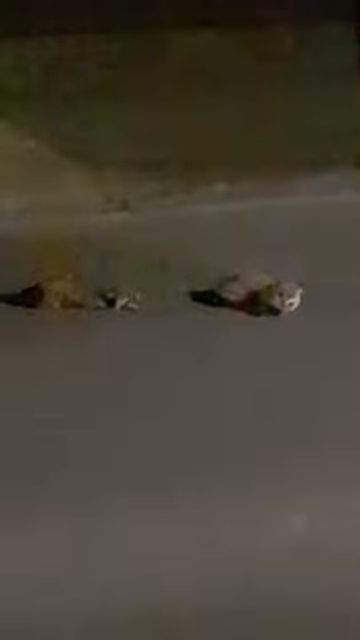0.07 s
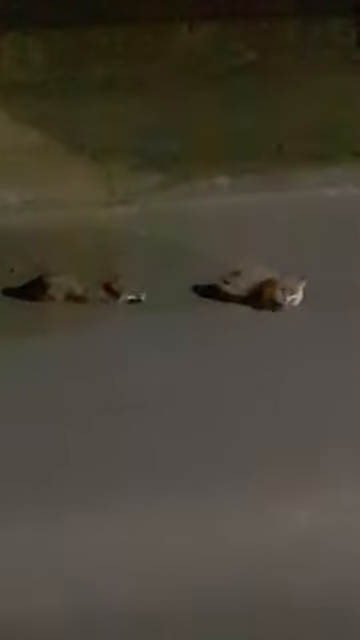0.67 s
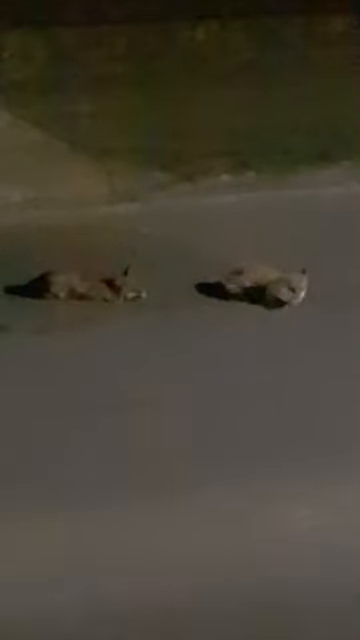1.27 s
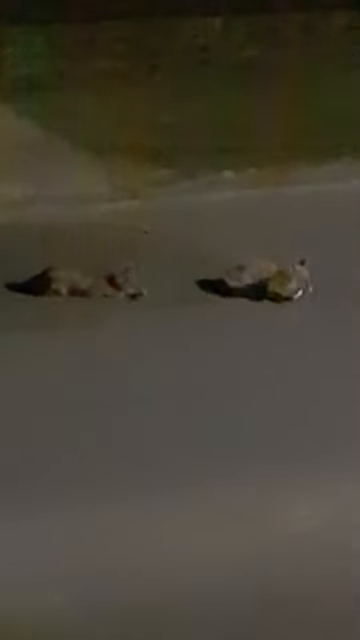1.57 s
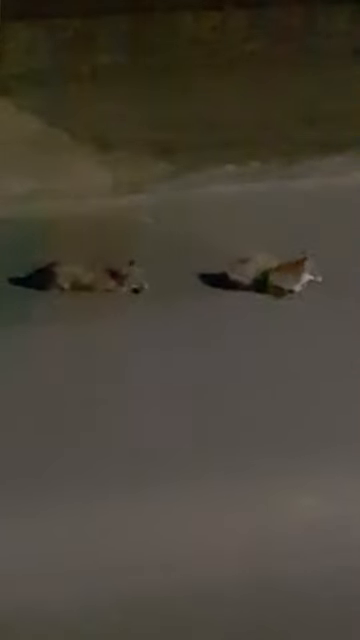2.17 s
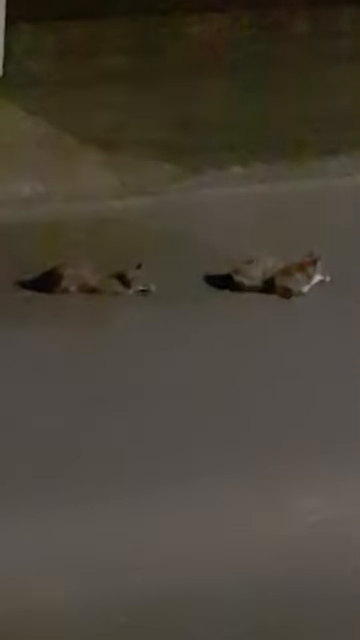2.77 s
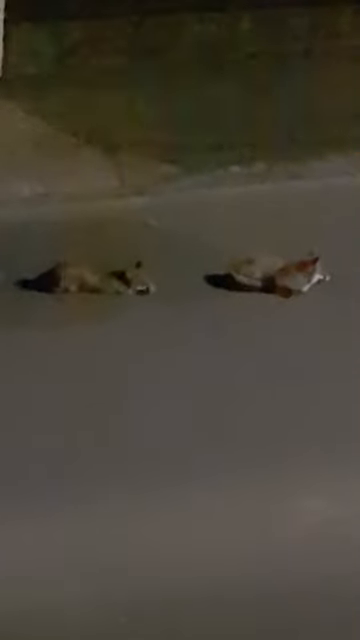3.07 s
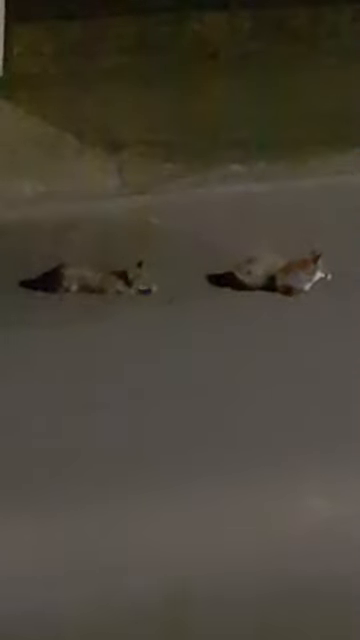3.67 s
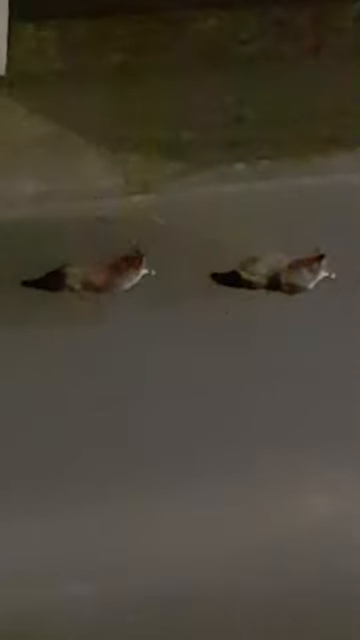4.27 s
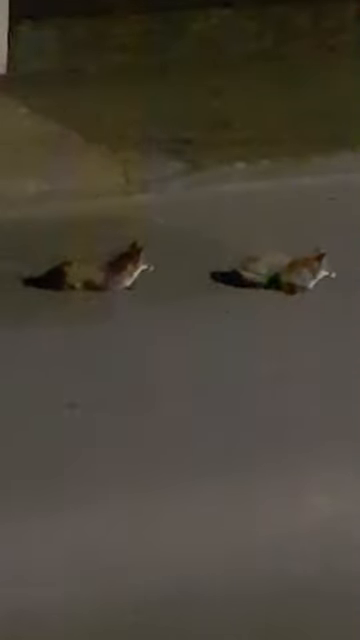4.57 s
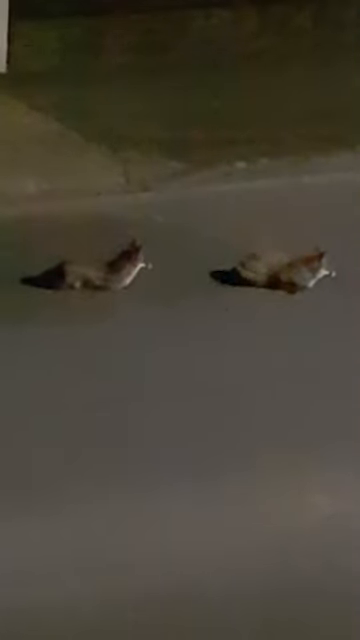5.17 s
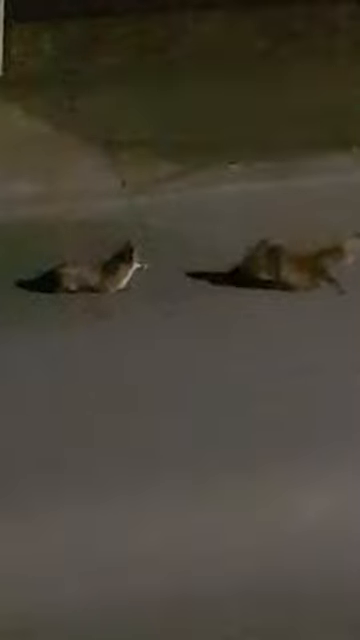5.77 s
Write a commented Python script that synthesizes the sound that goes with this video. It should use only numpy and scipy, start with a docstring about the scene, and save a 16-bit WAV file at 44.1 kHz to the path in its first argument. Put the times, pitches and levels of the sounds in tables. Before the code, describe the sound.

Two foxes cry out together at the start, one with a rasping, piercing scream that sags in pitch, the other with three short wails. After a brief gap come a quick yelp and a thin, falling whine, each with a short outdoor echo. The night street then stays quiet, with far traffic rumbling under light microphone hiss and a couple of very faint rustles.

```python
"""Two foxes face off on a quiet street at night. One opens with a high, harsh scream from overdriven
vocal folds; the other wails across it three times. A short yelp follows at 0.9 s, a long falling whine
at 1.5 s, then two faint rustles. House fronts throw the calls back. Throughout, far traffic rumbles
under the faint hiss of the microphone."""
import sys
import numpy as np
from scipy import signal
from scipy.fft import rfft, irfft
from scipy.io import wavfile
from scipy.ndimage import uniform_filter1d

SR = 44100
rng = np.random.default_rng(int(sys.argv[2]) if len(sys.argv) > 2 else 0)


def wav_out(sig):
    """Save sig, one row per channel (or a flat mono array), as 16-bit PCM at SR to the path in sys.argv[1]."""
    wavfile.write(sys.argv[1], SR, np.round(np.clip(np.atleast_2d(sig).T, -1, 1) * 32767).astype(np.int16))


N = 256662
T = np.arange(N) / SR
HZ = np.fft.rfftfreq(N, 1 / SR)

# Held scream. Each row: time in seconds, pitch in Hz.
SCREAM_PITCH = [(0, 1517), (0.029, 1559), (.16, 1548), (0.199, 1477), (0.227, 1556), (0.251, 1560),
                (.28, 1507), (0.321, 1464), (.43, 1433), (.475, 1349), (.57, 1203)]
# Other calls. Each row: time in seconds, pitch in Hz, level in dB, jaw opening from 0 to 1.
WAIL_CURVES = [
    [(.115, 1465, -34.5, 0.3), (.145, 1312, -39.5, 0.47), (.175, 1240, -37, 0.79), (.215, 1328, -45, .4)],
    [(.25, 1352, -38.5, 0.1), (.28, 1320, -36, .66), (.31, 1212, -32, .66), (.333, 1099, -28, .8),
     (.347, 1043, -35, .8)],
    [(.39, 1091, -32.5, 0.72), (.405, 1107, -27, 0.68), (.44, 1161, -30.5, 0.88), (.5, 1083, -30.5, 0.7),
     (.53, 1077, -40, .62), (.555, 1045, -44, .15), (.59, 957, -46.5, 0.33), (.635, 897.5, -39, .1),
     (.68, 712, -52, 0.38)],
]   # one list per wail
YELP_CURVE = [(.904, 1341, -37, 0), (.938, 1437, -33.5, .24), (.955, 1386, -37.5, 0.21),
              (.97, 1292, -28.5, .43), (.988, 1180, -38.5, 0.46), (1.005, 940, -47, 0.2),
              (1.028, 815, -41.5, 0.1), (1.035, 523, -65, .05), (1.052, 380, -59, .05)]
WHINE_CURVE = [(1.472, 1176, -58, 0.33), (1.528, 1260, -37.5, 0.71), (1.548, 1188, -32, 0.49),
               (1.575, 1049, -43, 0.21), (1.685, 1046, -42.5, 0.13), (1.72, 1034, -56.5, 0.4),
               (1.74, 1054, -41.5, .02), (1.82, 1030, -46, .17), (1.86, 920, -49, 0.31),
               (1.9, 856, -46, 0.034), (1.99, 677.5, -60, .01)]
# Mouth filter of each call. Each row: frequency in Hz, gain in dB.
SCREAM_MOUTH = [(4000, -0.5), (4650, 3.5), (6100, -15), (7600, -1.5), (9000, -10.5), (10700, -1.5),
                (11300, -11.5), (11700, -29), (15000, -39)]
WAIL_MOUTH = [(2900, -4), (3450, 3.5), (3900, -6), (4600, 0), (5500, -8), (6700, -0.5), (7600, -9),
              (8500, 3.5), (9100, -7), (9700, -4.5), (11000, -19.5), (11700, -34), (14000, -41.5)]
YELP_MOUTH = [(2500, -2), (3900, 8.5), (5000, -9), (5800, 5), (7000, -8), (8500, -13), (11000, -30)]
WHINE_MOUTH = [(2600, -8), (3100, -5.5), (3550, 1.5), (3800, 4.5), (4200, -19), (4900, -26), (5300, -4),
               (6000, -7), (6500, -4), (7200, -22), (8200, -11), (9500, -26), (10800, -7), (13000, -32)]
# Spectra of the scream's rattle and of throat air. Each row: frequency in Hz, gain in dB.
RATTLE_SPECTRUM = [(300, -59), (620, -39), (780, -8), (865, -4.5), (935, -13.5), (1220, -14.5),
                   (1550, -6.5), (1800, 0.5), (1990, -8.5), (2170, 3.5), (2450, -9.5), (2800, -15.5),
                   (3600, -26), (4300, -31.5), (5200, -19), (6300, -34.5), (8500, -26), (9500, -31.5),
                   (11000, -30), (14000, -49.5)]
RASP_SPECTRUM = [(500, -20), (900, -0.5), (1400, 7.5), (2400, 8), (3600, 3), (16000, 1.5)]
# Throat catches as the wailing starts. Each row: start in seconds, level before filtering in dB.
THROAT_CATCHES = [(.102, -35.5), (.119, -35.5), (.134, -32.5)]
# House-front echoes. Each row: delay in seconds, gain in dB, left minus right in dB.
HOUSE_ECHOES = [(.061, -7, -1), (.134, -23, -1)]
# Street reverberation. Each row: band centre in Hz, 60 dB decay time in seconds, gain in dB.
REVERB_BANDS = [(700, 0.86, -11.5), (1420, 1, -12.5), (2505, 0.78, -18), (4425, 0.46, -4),
                (9120, 0.29, -16)]
# Tyre roar. Each row: time in seconds, level in dB.
TYRE_LEVELS = [(0, -65.5), (1.1, -72), (2.2, -69.5), (2.95, -72.5), (3.3, -69.5), (4.1, -73), (4.75, -69.5),
               (5.82, -71)]
# Far engine. Each row: peak time in seconds, pitch in Hz, peak level in dB.
ENGINE_SWELLS = [(.4, 122, -48), (2.35, 143, -63), (4.65, 143.7, -49), (5.8, 140, -55)]
# Rustles. Each row: peak time in seconds, length in seconds, level in dB.
RUSTLE_SWELLS = [(3.102, 0.32, -82), (4.498, .5, -83.5)]
# Background noise spectra. Each row: frequency in Hz, gain in dB.
RUMBLE_SPECTRUM = [(15, -46.5), (25, -16.5), (40, -15.5), (75, -4), (134, -0.5), (172, -7), (228, -6.5),
                   (280, -10.5), (450, -26), (574, -28.5), (640, -27.5), (830, -54), (1410, -120)]
RUMBLE_SIDE_BOOST = [(25, 7), (80, -0.5), (170, -0.5), (350, 7.5), (600, 8.5)]   # on the left-right difference only
TYRE_SPECTRUM = [(400, -9), (620, -13), (740, -2.5), (820, -2.5), (950, -10.5), (1300, -21), (1900, -28.5),
                 (2250, -16), (2600, -34), (4000, -39.5)]
RUSTLE_SPECTRUM = [(1500, -20), (3000, -2), (4000, 0), (5500, -8), (10000, -13)]
HISS_SPECTRUM = [(500, -6), (1500, 2), (3000, -1.5), (5000, -4), (8000, -6), (10000, -3.5), (12000, -1),
                 (15700, -1)]
# Right microphone port against the left. Each row: frequency in Hz, phase in radians.
PORT_PHASE = [(1000, -0.088), (1420, 0.68), (2000, -0.069), (2580, -.22), (3200, -0.047), (4500, 0)]


def scream(top_hz=1550, base_db=-25, push_db_per_s=9, sag_db_per_hz=.042, attack_s=.035, release_s=.1):
    """The fox pushes harder as it goes on, but the tone weakens as its pitch sags."""
    sag_hz = top_hz - in_time(SCREAM_PITCH)[0]
    start_s, end_s = SCREAM_PITCH[0][0], SCREAM_PITCH[-1][0]
    envelope_db = np.interp(T, [start_s, start_s + attack_s, end_s - release_s, end_s], [-3, 0, 0, -5])
    db = base_db + push_db_per_s * (T - start_s) - sag_db_per_hz * sag_hz + envelope_db
    tone, pitch_hz, phase = voice(SCREAM_PITCH, (db, db - 24, db - 37), SCREAM_MOUTH, jitter=.0025,
                                  wobble=.002, shimmer_db=.6, rasp_db=-1, flicker_db=3)
    # The rattle stays strong through the sag, then dies just before the tone ends.
    # It needs full effort, so the envelope counts twice.
    rattle_db = db + envelope_db - 19 + .038 * sag_hz
    return tone + rattle(pitch_hz, phase, rattle_db)


def rattle(pitch_hz, phase, level_db, waver_db=3, blur_rad=.2, fade_from_s=.515, fade_db_per_s=350.5):
    """Overdriven folds repeat only every fifth cycle, adding lines between the scream's harmonics."""
    gate, lines = call_gate(SCREAM_PITCH), np.zeros(N)
    on = gate > 0
    waver, slip_rad = drift(46), blur_rad * drift(120)
    for k in [n / 5 for n in range(2, 45) if n % 5]:
        line_db = at_hz(RATTLE_SPECTRUM, k * pitch_hz[on]) + waver_db * shifted(waver)[on]
        # Higher lines blur into hoarseness.
        offset_rad = rng.uniform(0, 2 * np.pi) + max(k - 1, 0) * shifted(slip_rad)[on]
        lines[on] += from_db(line_db) * np.sin(k * phase[on] + offset_rad)
    fade_db = fade_db_per_s * np.maximum(T - fade_from_s, 0)
    return gate * lines * from_db(level_db - fade_db)


def cry(curve, mouth, overtones_db, follow, medium_db=-40, slack_hz=940, bloom_s=.011, **texture):
    """Wail, yelp or whine. An opening jaw shifts energy to the octave and lifts the overtones."""
    pitch_hz, db, jaw = in_time(curve)
    opening = np.clip(jaw, 0, 1) - .5
    octave_lead_db = 59.5 * opening
    fundamental_db = db - 10 * np.log10(1 + from_db(octave_lead_db) ** 2)
    # Overtones bloom after the onset, fade as the folds go slack and follow part of the level swing.
    bloom_db = 13 * np.exp(-np.maximum(T - curve[0][0], 0) / bloom_s)
    slack_db = .24 * np.maximum(slack_hz - pitch_hz, 0)
    upper_db = overtones_db + follow * (db - medium_db) + 7.5 * opening - slack_db - bloom_db
    return voice(curve, (fundamental_db, fundamental_db + octave_lead_db, upper_db), mouth, **texture)[0]


def voice(curve, levels_db, mouth, jitter, wobble, shimmer_db, rasp_db, flicker_db):
    """Vocal folds on an unsteady pitch; air torn by each cycle adds rasp."""
    pitch_hz = in_time(curve)[0]
    fundamental_db, octave_db, upper_db = levels_db
    gate = call_gate(curve)
    on = gate > 0
    # Faster slides make the folds less regular.
    slide_per_s = uniform_filter1d(np.abs(np.gradient(np.log(pitch_hz))) * SR, size=700)
    roughness = 1 + np.minimum(slide_per_s / 4, 2)
    unsteady_hz = pitch_hz * (1 + wobble * drift(40) + jitter * roughness * drift(350))
    phase = 2 * np.pi * np.cumsum(unsteady_hz) / SR
    tone = from_db(fundamental_db) * np.sin(phase) + from_db(octave_db) * np.sin(2 * phase)
    wander_db = flicker_db * drift(32)
    for k in range(3, 13):
        harmonic_db = upper_db[on] + at_hz(mouth, k * pitch_hz[on]) + shifted(wander_db)[on]
        tone[on] += from_db(harmonic_db) * np.sin(k * phase[on])
    pulsed_air = noise(RASP_SPECTRUM, mouth) * (1 + .4 * np.cos(phase))
    rasp = from_db(upper_db + rasp_db) * roughness * pulsed_air
    return gate * (tone * from_db(shimmer_db * drift(180)) + rasp), pitch_hz, phase


def call_gate(curve, fade_s=.0055):
    """Opens just before a call, shuts just after it."""
    return np.clip(np.minimum(T - curve[0][0], curve[-1][0] - T) / fade_s + 1, 0, 1)


def throat_catches(decay_s=.002):
    """Tiny bright bursts of air."""
    bursts = sum(from_db(db) * (T >= s) * np.exp(-np.abs(T - s) / decay_s) for s, db in THROAT_CATCHES)
    return bandpass(bursts * rng.standard_normal(N), 6000, 7600)


def street(calls, build_up_s=.011):
    """Distinct echoes off house fronts, then a scattered tail whose treble dies first."""
    thin = bandpass(calls, 1050, 2200)
    echoes = sum(panned(from_db(db) * np.interp(T - delay_s, T, thin, left=0), pan_db)
                 for delay_s, db, pan_db in HOUSE_ECHOES)
    t, tail = T[:SR], 0
    white = rfft(rng.standard_normal((2, SR)))
    log_hz = np.log(np.arange(white.shape[1]) + 1)
    log_centres = np.log([row[0] for row in REVERB_BANDS])
    for share, (_, t60_s, db) in zip(np.eye(len(REVERB_BANDS)), REVERB_BANDS):
        band = irfft(white * np.interp(log_hz, log_centres, share), SR)
        decay = from_db(-60 * t / t60_s) * (1 - np.exp(-t / build_up_s))
        tail = tail + from_db(db) * band * decay / np.linalg.norm(decay)
    return echoes + signal.fftconvolve(wide(*tail, side_db=-5), calls[None], axes=1)[:, :N]


def traffic(rumble_db=-53, ease_db_per_s=.5346, swell_db_per_s=83.5):
    """Far off: a slowly easing rumble, tyre roar and swells of one engine's wavering drone."""
    rumble = wide(noise(RUMBLE_SPECTRUM), noise(RUMBLE_SPECTRUM, RUMBLE_SIDE_BOOST), side_db=-29.5)
    rumble *= from_db(rumble_db - ease_db_per_s * T)
    tyres = wide(noise(TYRE_SPECTRUM), noise(TYRE_SPECTRUM), side_db=-13.5)
    tyres *= from_db(in_time(TYRE_LEVELS)[0])
    engine_hz = in_time(ENGINE_SWELLS)[0] * (1 + .09 * drift(15))
    swells = sum(from_db(db - swell_db_per_s * np.abs(T - s)) for s, _, db in ENGINE_SWELLS)
    engine = swells * np.sin(2 * np.pi * np.cumsum(engine_hz) / SR)
    return rumble + tyres + engine


def rustles(patchy_db=3):
    """Soft, uneven brushing that swells and fades."""
    swells = sum(from_db(db) * np.exp(-(2 * (T - s) / length_s) ** 2) for s, length_s, db in RUSTLE_SWELLS)
    return swells * from_db(patchy_db * drift(20)) * noise(RUSTLE_SPECTRUM)


def microphone_hiss(level_db=-73):
    """Steady self-noise."""
    return from_db(level_db) * wide(noise(HISS_SPECTRUM), noise(HISS_SPECTRUM), side_db=-7.5)


def from_db(db):
    """Decibels to gain."""
    return 10 ** (np.asarray(db) / 20)


def unit_rms(x):
    """Scale to unit power."""
    return x / np.sqrt(np.mean(x ** 2) + 1e-20)


def in_time(rows):
    """Each column after time, at every sample."""
    times_s, *columns = np.transpose(rows)
    return [np.interp(T, times_s, column) for column in columns]


def at_hz(spectrum, hz):
    """Interpolate on a log-frequency axis."""
    points_hz, values = np.transpose(spectrum)
    return np.interp(np.log(hz + 1), np.log(points_hz), values)


def drift(rate_hz):
    """Unit-power wander, up to about rate_hz."""
    return unit_rms(irfft(rfft(rng.standard_normal(N)) / (1 + (HZ / rate_hz) ** 2), N))


def shifted(x):
    """Random circular shift, so each partial wanders by itself."""
    return np.roll(x, rng.integers(N))


def noise(*spectra):
    """Unit-power noise, shaped by all given spectra."""
    gain = from_db(sum(at_hz(spectrum, HZ) for spectrum in spectra))
    return unit_rms(irfft(rfft(rng.standard_normal(N)) * gain, N))


def bandpass(x, low_hz, high_hz):
    """Butterworth band-pass."""
    return signal.sosfilt(signal.butter(2, [low_hz, high_hz], "band", fs=SR, output="sos"), x + 1e-18)


def wide(mid, side, side_db):
    """Two close microphones hear nearly the same thing."""
    return mid + from_db(side_db) * side * np.array([[1], [-1]])


def panned(x, pan_db):
    """Place a source by left-minus-right level."""
    return x * from_db(np.array([[.5], [-.5]]) * pan_db)


def scene():
    """The foxes in the street, over traffic, rustles and hiss."""
    wails = sum(cry(curve, WAIL_MOUTH, overtones_db=-63.5, follow=.45, jitter=.002, wobble=.007,
                    shimmer_db=1, rasp_db=-9, flicker_db=4) for curve in WAIL_CURVES)
    yelp = cry(YELP_CURVE, YELP_MOUTH, overtones_db=-67.5, follow=.92, jitter=.006, wobble=.002,
               shimmer_db=.5, rasp_db=-6, flicker_db=3)
    whine = cry(WHINE_CURVE, WHINE_MOUTH, overtones_db=-69, follow=.85, jitter=.005, wobble=.005,
                shimmer_db=.6, rasp_db=-10, flicker_db=5.5)
    duet = panned(scream(), pan_db=-3.3) + panned(wails + throat_catches(), pan_db=-2)
    late_calls = panned(yelp + whine, pan_db=1.85)
    # The duet is aimed away from the house fronts, so less of it returns.
    to_walls = (from_db(-5) * duet + late_calls).mean(axis=0)
    hiss = microphone_hiss()
    return duet + late_calls + street(to_walls) + traffic() + rustles() + hiss


def record(dry, cutoff_hz=15750):
    """The two ports differ slightly in phase; the top is cut steeply."""
    phase_rad = at_hz(PORT_PHASE, np.fft.rfftfreq(2 * N, 1 / SR))
    right = irfft(rfft(dry[1], 2 * N) * np.exp(1j * phase_rad))[:N]
    return signal.sosfilt(signal.ellip(12, .1, 90, cutoff_hz, fs=SR, output="sos"), [dry[0], right])


dry = scene()
out = record(dry)
wav_out(out)
```